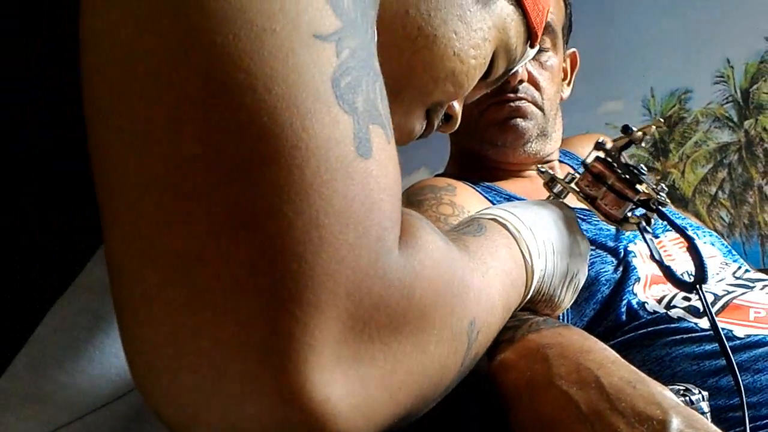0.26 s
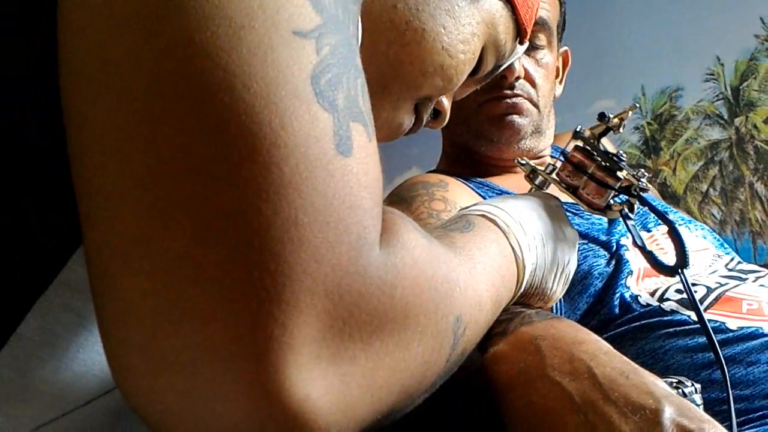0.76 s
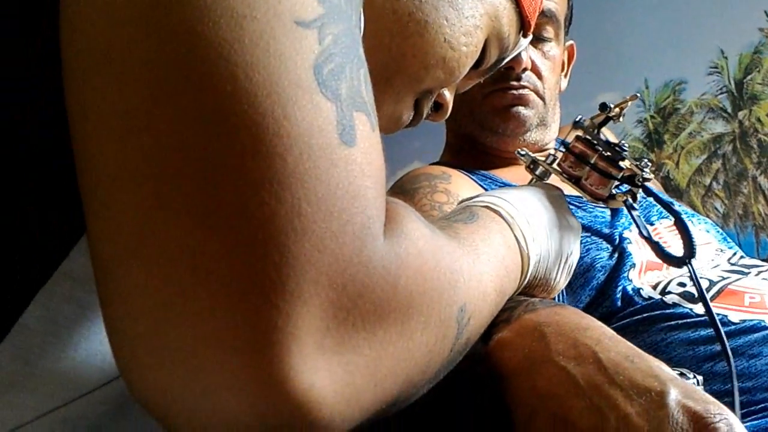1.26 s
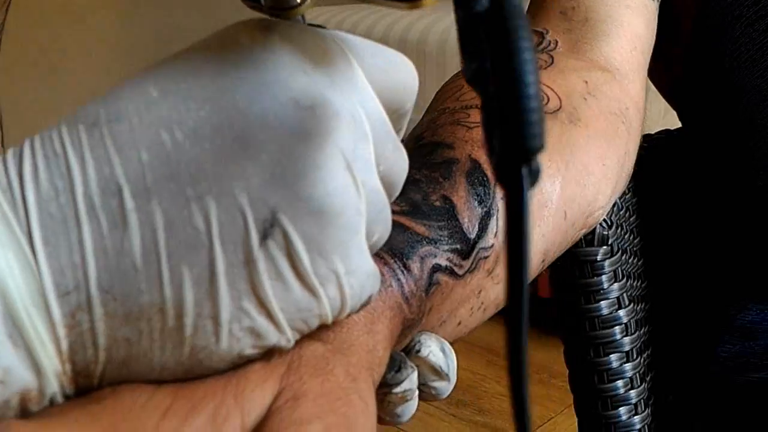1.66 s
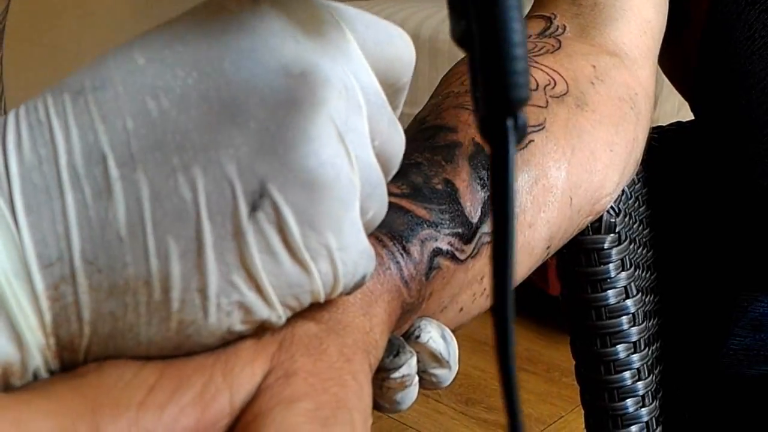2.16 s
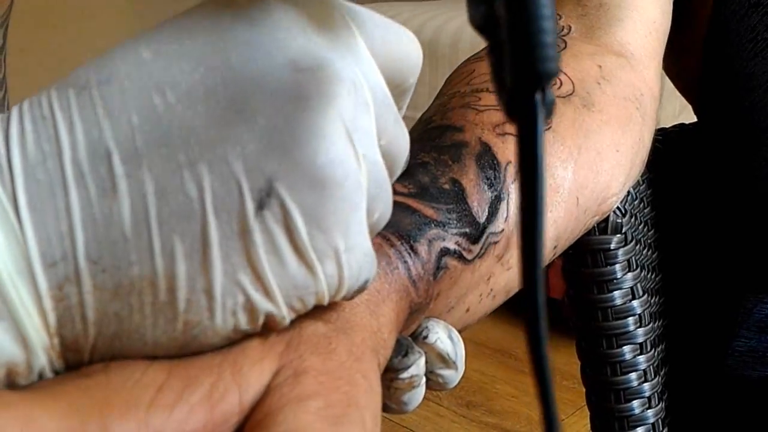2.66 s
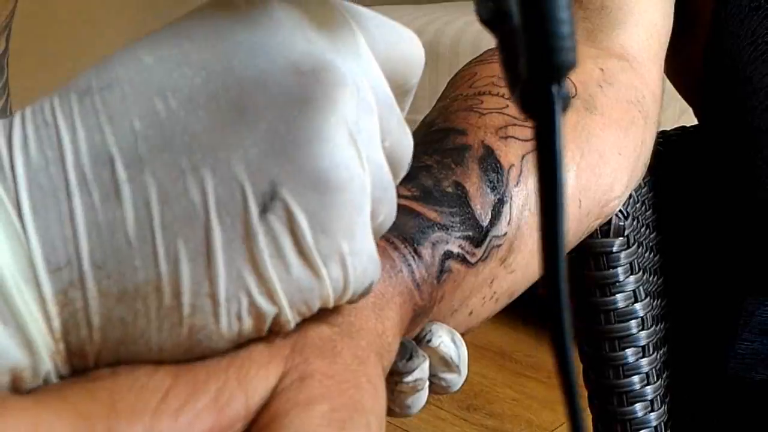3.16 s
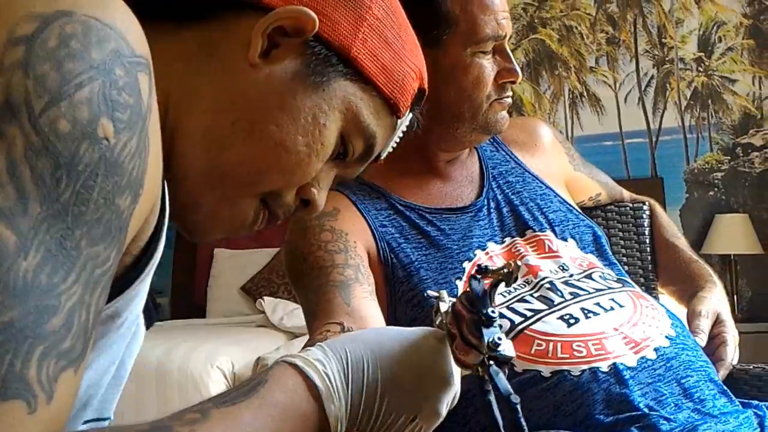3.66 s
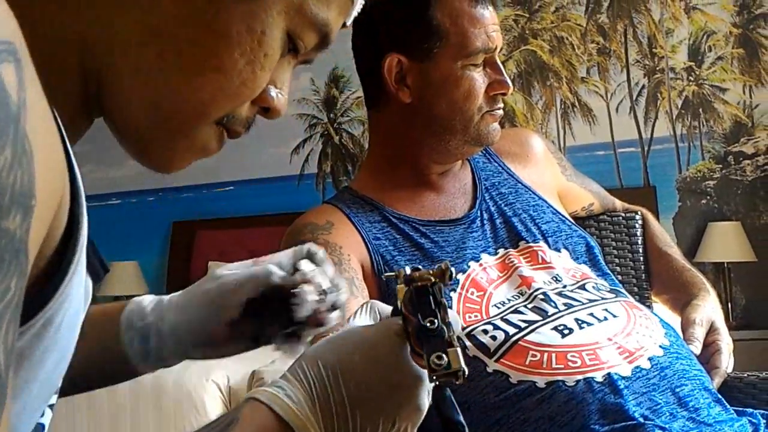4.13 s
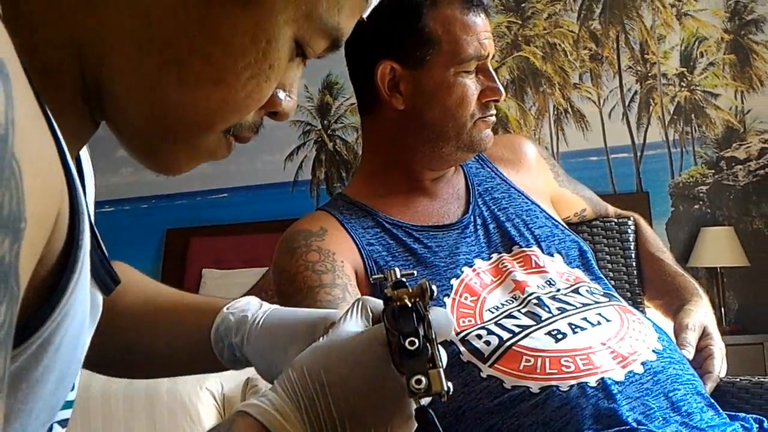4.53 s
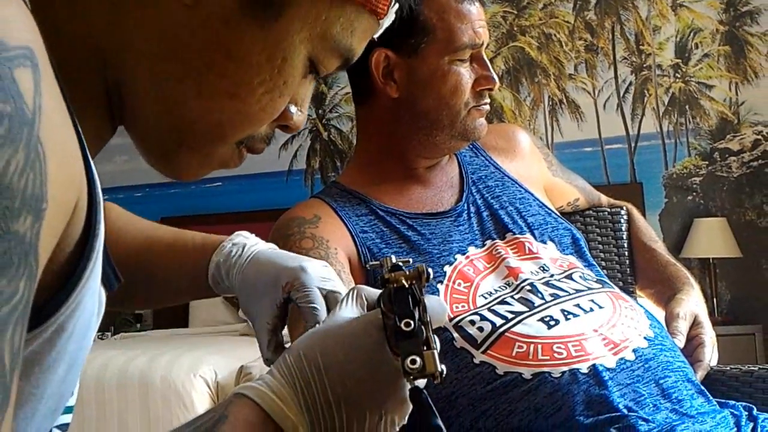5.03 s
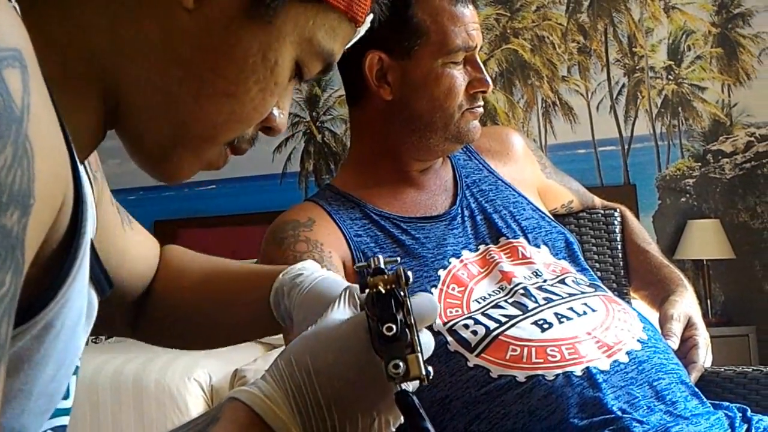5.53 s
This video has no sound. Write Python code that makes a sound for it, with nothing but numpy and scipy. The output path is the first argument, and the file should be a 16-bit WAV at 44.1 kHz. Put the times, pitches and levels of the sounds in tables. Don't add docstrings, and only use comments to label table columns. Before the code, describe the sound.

A coil tattoo machine buzzes in a small bedroom, its armature slapping metal about 92 times a second. From 0 to 1.5 s it is heard from behind an arm: raspy, ringing, with loose rattle and some room reflection. At 1.5 s the tone jumps to a close view, drier, tighter and hissier, sagging and roughening slightly around 2.8 s as the needles dig in. At 3.4 s it jumps again, louder and brighter in the open, dips briefly near 3.6 s, then stops dead at about 4.0 s with a very short room tail. What remains is quiet: a low, slightly unsteady air-conditioner hum, soft air rush, thin warbling motor whines and faint microphone hiss. At about 5.32 s a glove softly touches and knocks a part, a short hollow ring, with a small bright click at 5.38 s. From 5.5 s paper crackles very faintly, growing toward the end at 6 s.

```python
import sys
import numpy as np
from scipy import signal
from scipy.fft import rfft, irfft, next_fast_len
from scipy.io import wavfile
from scipy.ndimage import uniform_filter1d

SR = 44100
rng = np.random.default_rng(int(sys.argv[2]) if len(sys.argv) > 2 else 0)


def generate_wav(sig):
    pcm = np.round(np.clip(np.atleast_2d(sig).T, -1, 1) * 32767).astype(np.int16)
    wavfile.write(sys.argv[1], SR, pcm)


def gain_from_db(level_db):
    decades = np.asarray(level_db, float) / 20
    return 10 ** decades


N = 255339
TIME = np.arange(N) / SR
SIZE = next_fast_len(N + SR)
FREQ = np.arange(SIZE // 2 + 1) * SR / SIZE

CUTS_S = (0, 1.4932, 3.4285, 6)

# first_s, slaps, period_ms, slowing_us_per_slap
STROKE = [(0.0048, 137, 10.745, .96), (1.49505, 178, 10.7837, .34), (3.4354, 53, 10.816, 1.5)]
# deepest_s, half_length_s, late_ms
PRESS = [(.25, .17, .5), (2.8, .18, 1.8), (3.64, .09, .6)]
# shift_ms, phase_rad
RIPPLE = [(0.1, -0.4), (0.186, -2.05), (0.14, 2.96)]
# level_db, growth_db_per_s, dig_db
LOUD = [(-33.5, 0.58, 0.37), (-31, 0, 0.9), (-28.5, 1.5, 0.6)]
# chatter_ms, ring_delay_ms, ring_t60_s, ring_db, room_db, changing_share
PLACE = [(0.16, 0.81, 0.034, -5, -5, 0.6), (0.067, 0.62, 0.014, -12.5, -7.5, 0.28),
         (0.17, 0.69, 0.019, -11.5, -12, 0.57)]
RATTLE_DB = (-4, -13, -9)
# delay_ms, level_db
ECHOES = [
    [(.3, -1.5), (.62, -4.5), (3.0, -12), (5.4, -26.5)],
    [(1.3, -8), (2.2, -26), (4.1, -21)],
    [(.45, -1.5), (.85, -8.5), (2.6, -27), (4.3, -14.5)],
]
# pitch_hz, width_hz, tick_db, ring_db
FRAME_BEHIND = [(1697, 160, -24.5, -18), (2390, 620, -24, -16.5), (3902, 468, -6, -11.5),
                (5655, 870, -8.5, -7), (7400, 740, -11.5, -12.5), (8660, 570, 4.5, -9.5),
                (11340, 730, -14, -8.5), (12020, 500, -9.5, -6.5), (13300, 880, -7, -10.5),
                (14300, 1000, 1, -9), (14370, 900, -1.5, -9.5)]
# pitch_hz, width_hz, tick_db, ring_db
FRAME_CLOSE = [(1737, 500, -30, -27), (2280, 780, -30, -24.5), (3024, 490, -13.5, -18),
               (3923, 520, -13, -17), (5850, 1530, -8, -18), (7090, 1300, -14, -21.5),
               (8430, 1200, -12, -14), (11395, 900, 6, -10), (12080, 530, 1, -14.5), (12900, 600, 5.5, -8),
               (14010, 490, 3, -6), (15340, 600, 2, -5.5)]
# pitch_hz, width_hz, tick_db, ring_db
FRAME_OPEN = [(1783, 300, -18.5, -19.5), (2550, 500, -22.5, -19), (3090, 490, -28.5, -14.5),
              (3790, 170, -18.5, -16), (4460, 430, -19, -14), (5830, 450, 2, -3), (7100, 2100, -16, -13),
              (11420, 500, 1.5, -4.5), (12240, 690, -0.5, -10.5), (13160, 280, -6.5, -6),
              (14085, 870, 6, -7), (15040, 700, 3, -3), (15200, 170, -4, -7)]
# pitch_hz, width_hz, depth_0_to_1
DIPS = [
    [(1960, 180, 0.4)],
    [(2200, 300, 0.4), (3340, 160, 0.7), (5040, 190, 0.6)],
    [(2110, 180, 0.4), (4120, 100, 1), (13250, 250, 0.1)],
]
# multiple_of_slap_rate, level_db
TONES = [
    [(1, -71), (2, -76), (9, -73.6), (13, -66), (14, -75), (15, -71), (17, -68), (18, -64), (19, -59),
     (20, -60), (21, -64), (24, -62)],
    [(1, -73), (5, -74), (7, -73.7), (8, -74.6), (12, -73.2), (13, -74.3), (14, -78), (15, -71), (17, -70),
     (18, -66), (19, -71)],
    [(1, -70), (2, -75), (9, -64), (13, -68.6), (16, -70), (17, -63), (18, -59), (19, -59), (20, -61),
     (21, -63)],
]

# start_s, peak_db, push_ms
KNOCKS = [
    (5.317, -53, 3.3),
    (5.3305, -35, 1.2),
    (5.378, -40, 0.71),
]
# pitch_hz, level_db, t60_s
KNOCK_MODES = [
    [(980, 13, .08)],
    [(850, 4, .04), (990, -1, 0.05), (1290, 15, 0.036), (1430, 5, 0.041), (2550, 1, 0.04),
     (3160, -2, 0.037), (5560, 3, 0.014), (4150, -3, .01), (7700, -5, 0.0088)],
    [(3030, -8, 0.01), (5350, -11.5, 0.043), (7000, -12, 0.011), (11650, -15, 0.0071)],
]
# time_s, level_db
RUSTLE = [
    (5.5, -80),
    (5.58, -67),
    (5.65, -62),
    (5.79, -61),
]
# pitch_hz, density_db
PAPER = [(300, -24), (1110, 2.5), (1360, 3), (1830, 0), (2840, 10), (4500, -3), (9000, -22), (11700, -60)]

# compressor_hz, level_db, growth_db_per_s, second_motor_db, mains_db
HUM = [(36.94, -51.5, 1.5, -12.5, -20.5), (36.85, -58.5, 0, -18, -37.5), (38.6, -51.5, 0.3, -20.5, -37)]
# pitch_hz, density_db
AIR = [(44, -22), (80, -10.5), (200, -18), (2110, -25), (2880, -16), (3900, -28.5), (5280, -23.5),
       (7550, -40.5)]
AIR_DB = (-62.5, -67, -63)
# pitch_hz, width_hz, level_db
WHINE = [(883, 33, -12), (1394, 15, 0), (1615, 15, -7), (2132, 16, -11), (2422, 16, -6), (2643, 15, -6),
         (2789, 16, -5), (3230, 22, -12), (3590, 20, -9), (5146, 20, -12), (5281, 20, -10)]
FAN_DB = [-15, -9, -10, -2, 0, -6, -8, -6, -7, -10]
# pitch_hz, step_db
LOW_GRAIN = [(40, -16), (150, -10), (300, -8), (1500, -8), (2500, -9), (4300, -9.5)]


def machine(stroke, press, ripple, loud, tones, frame, dips, echoes, place, rattle_db):
    chatter_ms, delay_ms, ring_t60, ring_db, room_db, change = place
    first, period = stroke[0], stroke[2] / 1000
    count, times, dig = slaps(stroke, press, ripple)
    swell = loud[0] + loud[1] * (times - first) + loud[2] * 2 * dig * np.exp(-dig ** 2)
    size = gain_from_db(swell + .4 * rng.standard_normal(len(times)))
    hits = train(times, size)
    tick = ticks(times, size, echoes, chatter_ms, change)
    wash = gain_from_db(room_db - 30.5) * hits * bedroom()
    wash = wash + gain_from_db(ring_db) * ringing(times - first, times, size, hits, delay_ms, ring_t60, change, rattle_db)
    hz, width, tick_db, body_db = np.transpose(frame)
    sound = tick * causal(resonances(hz, width, tick_db))
    sound = sound + gain_from_db(14.0) * wash * causal(resonances(hz, width, body_db))
    for f, w, depth in dips:
        sound = sound * (1 - np.clip(depth, 0, 1) / (1 + (2 * (FREQ - f) / w) ** 2))
    stop = times[-1] + period
    running = np.where(TIME < stop, 1, fade(TIME - stop, 0.051))
    follow = gain_from_db(np.interp(TIME, times, swell) - swell.mean())
    low = np.sqrt(2) * drone(times, count, period, tones) * running * follow
    return gain_from_db(28) * irfft(sound, SIZE)[:N] + low


def slaps(stroke, press, ripple):
    first, last, period_ms, slowing = stroke
    deepest, half_length, late_ms = press
    ripple_ms, phase = ripple
    ripple_hz = 100
    count = np.arange(-30, last + 1)
    times = first + period_ms / 1000 * count + slowing * 1e-6 * count ** 2 / 2
    dig = (times - deepest) / half_length
    times = times + late_ms / 1000 * np.exp(-dig ** 2)
    times = times + ripple_ms / 1000 * np.sin(2 * np.pi * ripple_hz * times + phase)
    return count, times, dig


def ticks(times, size, echoes, chatter_ms, change):
    sway_share, sway_slaps = .04, 25
    t = np.arange(SR // 2) / SR
    contact = rng.standard_normal(len(t)) * t * np.exp(-t / (chatter_ms / 1000))
    drift = rng.standard_normal((len(echoes), len(times)))
    drift = uniform_filter1d(uniform_filter1d(drift, size=sway_slaps), size=sway_slaps)
    sway = 1 + sway_share * np.sqrt(sway_slaps) * drift
    ms, echo_db = np.transpose(echoes)[:, :, None]
    arrivals = np.r_[times, (times + sway * ms / 1000).ravel()]
    gains = np.r_[size, (size * gain_from_db(echo_db)).ravel()]
    varying = np.tanh(rng.standard_normal(len(times)))
    chatter = .5 * change * np.tile(varying, len(echoes) + 1)
    return train(arrivals, gains) + train(arrivals, gains * chatter) * even(contact)


def ringing(since, times, size, hits, delay_ms, t60, change, rattle_db):
    turn_rad_per_s, rattle_above_hz = 2.5, 2500
    t = np.arange(SR // 2) / SR
    shape = (1 - np.exp(-(t * 1000 / delay_ms) ** 2)) * fade(t, t60)
    rattle = irfft(hits * rfft(shape / np.linalg.norm(shape), SIZE), SIZE) * rng.standard_normal(SIZE)
    ring = gain_from_db(rattle_db) * rfft(rattle) * FREQ ** 2 / (FREQ ** 2 + rattle_above_hz ** 2)
    turn = turn_rad_per_s * since
    wander = change * np.tanh(2 * uniform_filter1d(rng.standard_normal(len(times)), size=3))
    for share in (np.cos(turn), np.sin(turn), wander):
        ring = ring + train(times, share * size) * even(rng.standard_normal(len(t)) * shape)
    return ring


def bedroom():
    t60_s, treble_t60_s = 0.43, 0.29
    t = np.arange(SR // 2) / SR
    low, high = rng.standard_normal((2, len(t)))
    dull = 1 / (1 + (FREQ / 7500) ** 4)
    low_tail = rfft(low * fade(t - .004, t60_s), SIZE)
    high_tail = rfft(high * fade(t - .004, treble_t60_s), SIZE)
    return low_tail * dull + high_tail * (1 - dull)


def drone(times, count, period, tones):
    turns = np.interp(TIME, np.r_[times, times[-1] + 1], np.r_[count, count[-1] + 1 / period])
    out = np.zeros(N)
    for multiple, db in tones:
        waver = gain_from_db(db + 1.0 * walk(25))
        out += waver * np.sin(2 * np.pi * (round(multiple) * turns + rng.random()))
    return out


def hands():
    out = np.zeros(N)
    for (start, peak_db, push_ms), modes in zip(KNOCKS, KNOCK_MODES):
        t = TIME - start
        ring = sum(gain_from_db(db) * np.sin(2 * np.pi * hz * t) * fade(t, t60) for hz, db, t60 in modes)
        ring = ring + gain_from_db(-10.0) * rng.standard_normal(N) * fade(t, 0.023)
        ring = ring * np.clip(t * 1000 / push_ms, 0, 1)
        out += gain_from_db(peak_db) * ring / np.abs(ring).max()
    crackle = level(noise(PAPER) * gain_from_db(2.5 * walk(70)), 0)
    return out + crackle * gain_from_db(np.interp(TIME, *np.transpose(RUSTLE), left=-120))


def cooler(start, hum, air_db, whine):
    hz, hum_db, growth, second_db, mains_db = hum
    second_hz, mains_hz, whine_over_air_db = 47.9, 100, 0.5
    lines = [(hz, 0), (second_hz, second_db + 2.5 * walk(5.4)), (mains_hz, mains_db)]
    motors = sum(np.sqrt(2) * gain_from_db(db) * np.sin(2 * np.pi * (f * TIME + rng.random())) for f, db in lines)
    rumble = irfft(rfft(rng.standard_normal(SIZE)) * resonances([50], 44.0, [0]))[:N]
    gusts = gain_from_db(1.2 * walk(3))
    low = gain_from_db(hum_db + growth * (TIME - start) + walk(5)) * (motors + level(rumble, -19))
    return low + level(noise(AIR) * gusts, air_db) + whine * gain_from_db(air_db + whine_over_air_db)


def whines():
    fan_hz, warble_hz, warble_share, fan_over_motors_db = 592.5, 5.5, 0.0063, 3
    hiss = rfft(rng.standard_normal(SIZE))
    warble = np.sin(2 * np.pi * warble_hz * TIME + .8 * walk(2))
    turns = np.cumsum(fan_hz * (1 + warble_share * warble + .002 * walk(60))) / SR
    fan, motors = np.zeros(N), np.zeros(N)
    for k, db in enumerate(FAN_DB, start=1):
        fan += flicker() * gain_from_db(db) * np.sin(2 * np.pi * k * turns)
    for hz, width, db in WHINE:
        motors += flicker() * irfft(hiss * resonances([hz], 0.37 * width, [db]))[:N]
    return level(level(fan, fan_over_motors_db) + level(motors, 0), 0)


def microphone_hiss():
    return level(np.diff(rng.standard_normal(N + 1)), -77)


def thin_lows(x):
    hop, offset = 1024, 762
    bins = np.arange(200) + .5
    window = signal.windows.kaiser_bessel_derived(2 * hop, 4 * np.pi)
    waves = np.cos(np.pi / hop * np.outer(bins, np.arange(2 * hop) + .5 + hop / 2))
    basis = window * waves * np.sqrt(2 / hop)
    padded = np.pad(x, (2 * hop - offset, 2 * hop))
    where = np.arange(len(padded) // hop - 1)[:, None] * hop + np.arange(2 * hop)
    lines = padded[where] @ basis.T
    slope = np.diff(padded, append=0)[where] * window
    treble = np.sqrt(np.mean(slope ** 2, axis=1, keepdims=True)) + 1e-9
    hz, db = np.transpose(LOW_GRAIN)
    step = treble * gain_from_db(np.interp(np.log(bins * SR / 2 / hop), np.log(hz), db))
    kept = np.sign(lines) * np.floor(np.abs(lines) / step + .4) * step
    np.add.at(padded, where, (kept - lines) @ basis)
    return padded[2 * hop - offset:][:N]


def level(x, db):
    return x * gain_from_db(db) / np.sqrt(np.mean(x ** 2))


def fade(t, t60):
    return (t >= 0) * np.exp(-np.log(1000) * np.maximum(t, 0) / t60)


def walk(rate):
    k = int(SR / rate)
    held = np.repeat(rng.standard_normal(N // k + 1), k)
    return 1.3 * uniform_filter1d(uniform_filter1d(held, k), k)[:N]


def flicker():
    return gain_from_db(2.5 * walk(3))


def noise(spectrum):
    hz, db = np.transpose(spectrum)
    gain = gain_from_db(np.interp(np.log(FREQ + 1), np.log(hz), db))
    return irfft(rfft(rng.standard_normal(SIZE)) * gain)[:N]


def even(burst):
    spectrum = rfft(burst, SIZE)
    return spectrum / np.sqrt(uniform_filter1d(np.abs(spectrum) ** 2, size=SIZE // 60))


def resonances(hz, width, db):
    detune = (FREQ[:, None] - np.array(hz) ** 2 / (FREQ[:, None] + 1)) / width
    return np.sqrt(np.sum((gain_from_db(np.array(db)) / (1 + .41 * detune ** 2)) ** 2, axis=1))


def causal(gain):
    cep = irfft(np.log(gain + 1e-7))
    cep[1:SIZE // 2] *= 2
    cep[SIZE // 2 + 1:] = 0
    return np.exp(rfft(cep))


def train(times, sizes):
    x, at = np.zeros(SIZE), times[:, None] * SR
    near = np.round(at) + np.arange(-8, 9)
    pulse = np.sinc(near - at) * np.cos(np.pi * (near - at) / 18) ** 2
    np.add.at(x, near.astype(int) % SIZE, sizes[:, None] * pulse)
    return rfft(x)


def scene():
    out, whine = np.zeros(N), whines()
    for k, frame in enumerate((FRAME_BEHIND, FRAME_CLOSE, FRAME_OPEN)):
        heard = (TIME >= CUTS_S[k]) & (TIME < CUTS_S[k + 1])
        mix = machine(STROKE[k], PRESS[k], RIPPLE[k], LOUD[k], TONES[k], frame, DIPS[k],
                      ECHOES[k], PLACE[k], RATTLE_DB[k])
        mix = mix + cooler(CUTS_S[k], HUM[k], AIR_DB[k], whine)
        if k == 2:
            mix = mix + hands()
        out = out + uniform_filter1d(1. * heard, size=8) * thin_lows(mix)
    return (out + microphone_hiss())[None]


def top_cut(x):
    return signal.sosfilt(signal.butter(12, 16550, fs=SR, output="sos"), x)


def record(dry):
    top_hz, edge_hz = 15770, 18
    lowpass = (1 - np.tanh((FREQ - top_hz) / edge_hz / 2)) / 2
    mix = irfft(rfft(dry[0], SIZE) * lowpass, SIZE)[:N]
    return top_cut(mix[None])


dry = scene()
out = record(dry)
generate_wav(out)
```